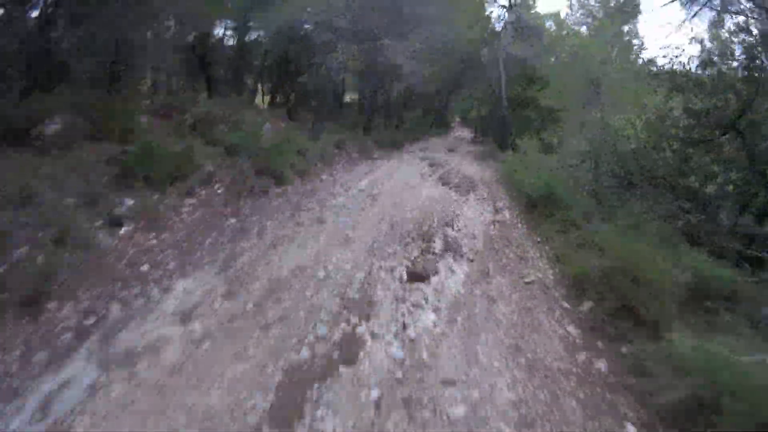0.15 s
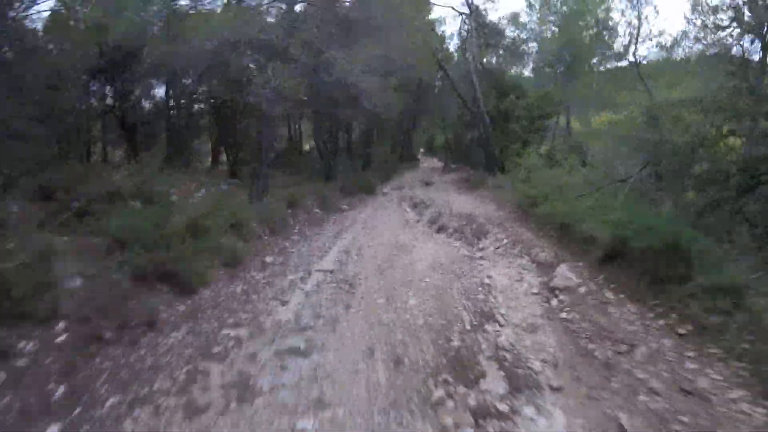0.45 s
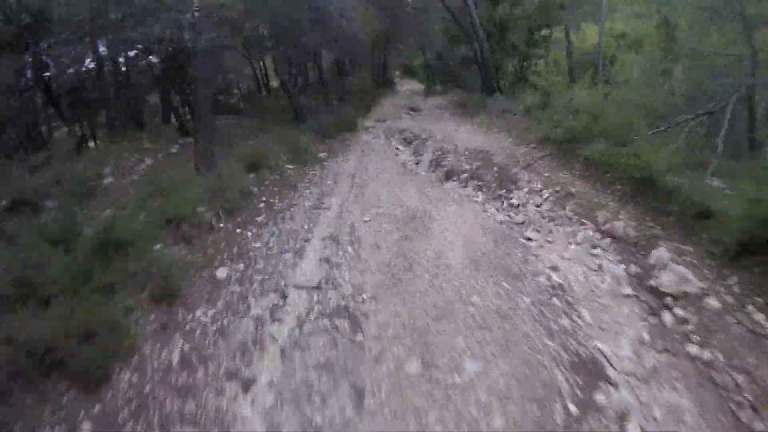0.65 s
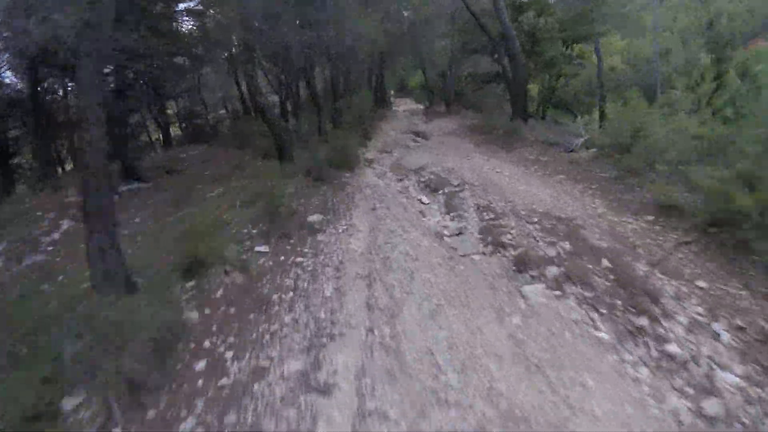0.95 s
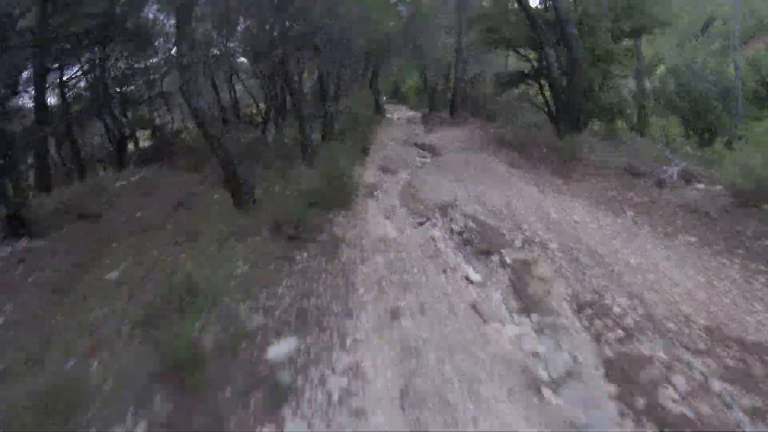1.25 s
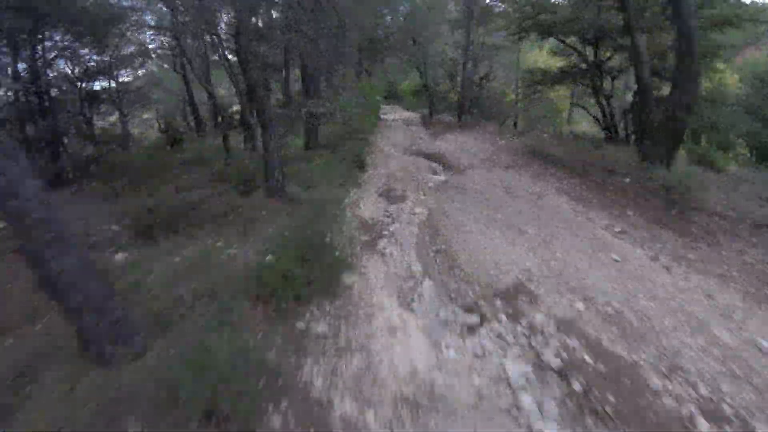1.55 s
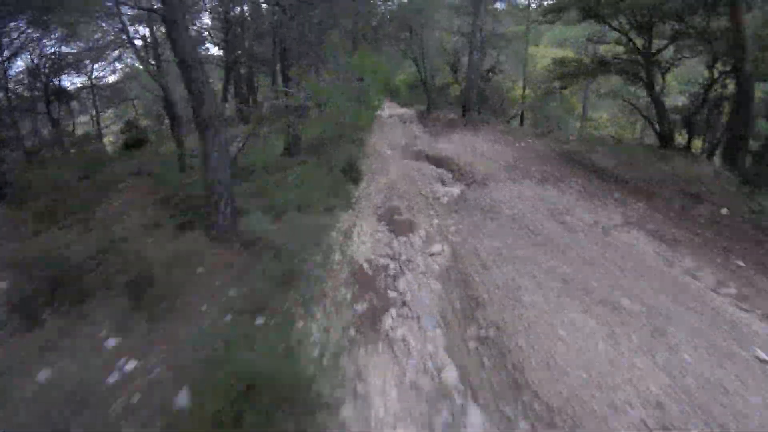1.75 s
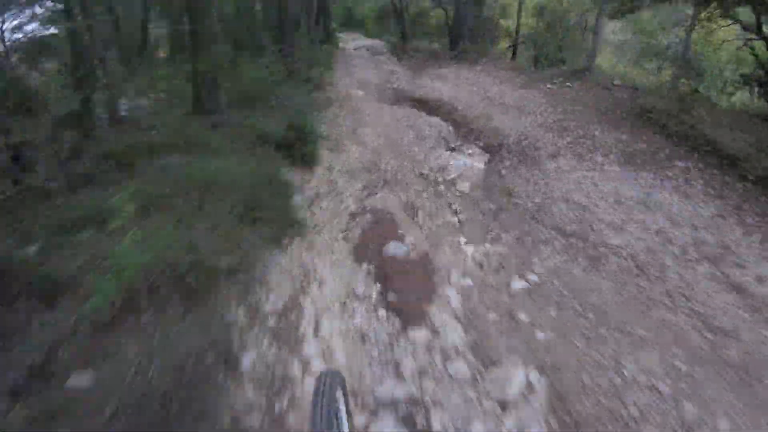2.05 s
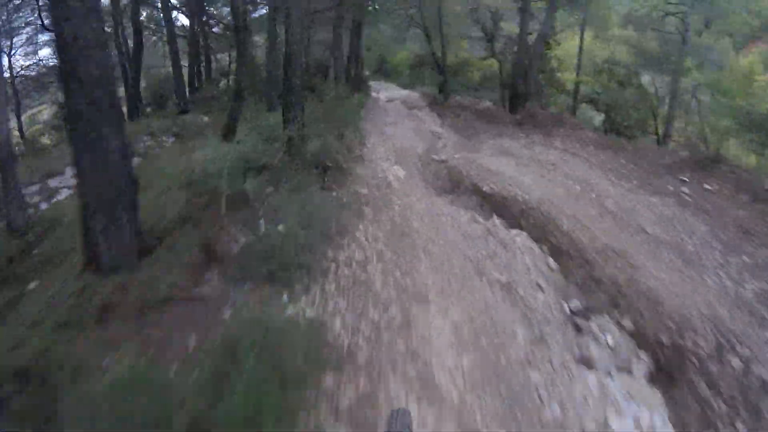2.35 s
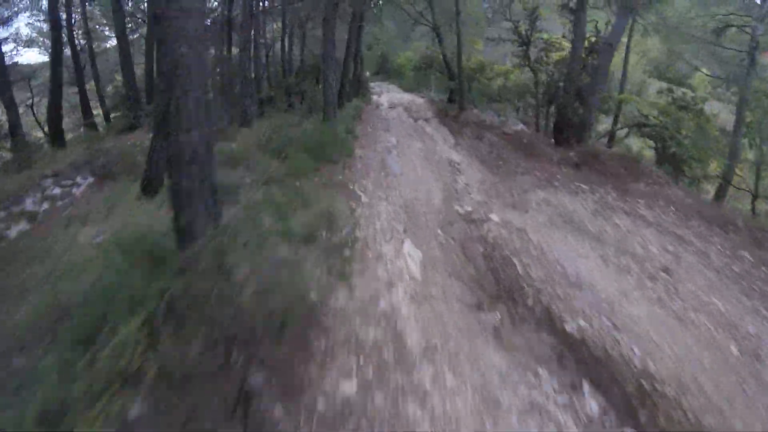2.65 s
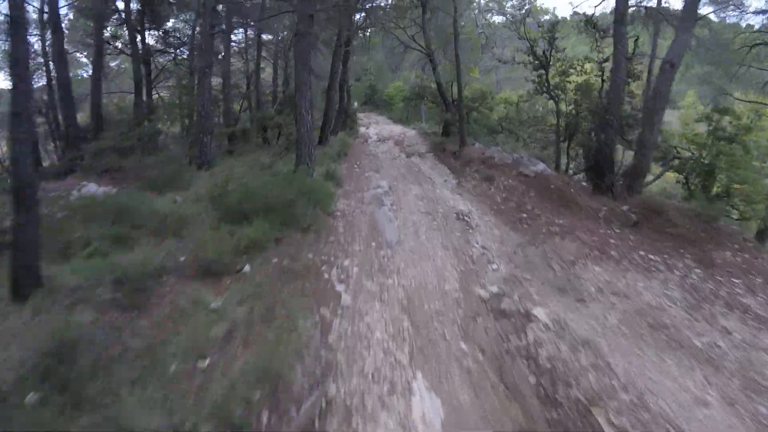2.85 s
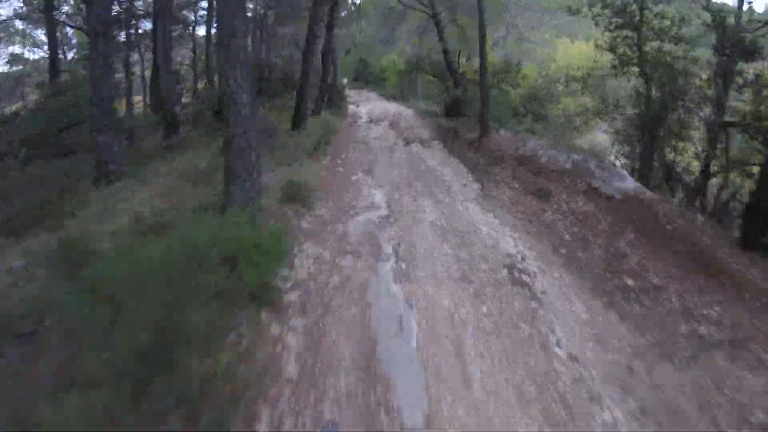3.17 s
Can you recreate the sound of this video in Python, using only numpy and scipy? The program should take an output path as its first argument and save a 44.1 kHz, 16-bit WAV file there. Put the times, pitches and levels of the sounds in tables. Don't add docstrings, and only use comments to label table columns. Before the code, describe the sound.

Bike tyres drum on loose stones, roughest near the start, with muffled wind thumping the enclosed onboard microphone; later a loud double clack, a brief hush, and the rumble gradually swelling back, outdoors without echo.

```python
import sys
import numpy as np
from scipy import signal
from scipy.fft import rfft, irfft
from scipy.io import wavfile
from scipy.ndimage import uniform_filter1d

SR = 44100
rng = np.random.default_rng(int(sys.argv[2]) if len(sys.argv) > 2 else 0)


def how_loud(loudness_db):
    steps = np.asarray(loudness_db, float) / 20
    return 10 ** steps


def wav_out(sig):
    wavfile.write(sys.argv[1], SR, np.round(np.clip(np.atleast_2d(sig).T, -1, 1) * 32767).astype(np.int16))


N = 145971


def evened(x):
    return x / np.sqrt(np.mean(x ** 2) + 1e-20)


def add(mix, start_s, sound):
    part = mix[round(start_s * SR):][:len(sound)]
    part += sound[:len(part)]


def wander(per_s):
    hz = np.fft.rfftfreq(N, 1 / SR)
    spectrum = rfft(rng.standard_normal(N)) / (1 + (hz / per_s) ** 2)
    return evened(irfft(spectrum, N))


def shell(x, modes, tilt_db=0):
    out = np.zeros(len(x))
    for k, (hz, width_hz, db) in enumerate(modes):
        b, a = signal.iirpeak(hz, hz / max(width_hz, 20), fs=SR)
        gain = how_loud(db + tilt_db * np.log2(hz / 4000))
        ring = signal.lfilter(b, a, signal.lfilter(b, a, x))
        sign = (-1) ** k
        out += sign * gain * ring / np.sqrt(width_hz)
    return out


# time in seconds, buffeting level in dB, ground roughness in dB.
RIDE_COURSE = [(0.0, -21.5, -50), (.2, -19, -45.5), (.4, -18.5, -43.5), (.51, -16, -42),
               (.65, -21.5, -43.5), (.7, -17, -46.5), (.78, -17, -52), (1.08, -17, -53), (1.21, -17, -48.5),
               (1.35, -18, -47.5), (1.45, -17, -48.5), (2.05, -18, -47.5), (2.16, -29.5, -58.5),
               (2.3, -25.5, -51.5), (2.65, -25, -55.5), (2.82, -21.5, -52), (3.17, -18, -47.5),
               (3.31, -17.5, -47)]


def ride_level(column):
    rows = np.array(RIDE_COURSE)
    return np.interp(np.arange(N) / SR, rows[:, 0], rows[:, column])


# frequency in Hz, level in dB per Hz.
BUFFET_SPECTRUM = [(8.8, -25), (15, -2), (70, -1), (292, -17), (572, -30), (945, -26.5), (1500, -42.5),
                   (1950, -54.5), (3300, -120)]


def buffet():
    trim_db, gust_db, gusts_per_s, even_s = 0.56, 0.88, 7.5, 0.057
    hz = np.fft.rfftfreq(N, 1 / SR)
    f, db = np.transpose(BUFFET_SPECTRUM)
    colour = how_loud(np.interp(np.log(hz + 1), np.log(f), db, right=-90))
    colour *= np.minimum(hz / f[0], 1) ** 2
    noise = evened(irfft(rfft(rng.standard_normal(N)) * colour, N))
    window = round(even_s * SR)
    power = uniform_filter1d(uniform_filter1d(noise ** 2, window), window)
    noise = evened(noise / np.sqrt(abs(power)))
    return noise * how_loud(ride_level(1) + trim_db + gust_db * wander(gusts_per_s))


def grit():
    per_s, spread_db, decay_s = 200, 2, 0.0015
    size = how_loud(spread_db * np.minimum(rng.exponential(1, N), 4))
    size = size * (rng.random(N) < per_s / SR)
    decay = np.exp(-np.arange(1500) / SR / decay_s)
    return evened(signal.oaconvolve(size, decay)[:N] * rng.standard_normal(N))


# frequency in Hz, width in Hz, level in dB.
LOW_SHELL_MODES = [(648, 415, 7), (931, 198, 6.5), (1180, 454, 4.5), (1528, 1400, -12.5)]
HIGH_SHELL_MODES = [(2572, 735, 5.5), (3648, 650, 1), (5000, 1100, -7), (5730, 1450, -7), (6650, 1170, -3),
                    (8800, 2600, -17), (11780, 3300, -13), (14500, 2500, -24)]


def tyres():
    buzz_db, flutter_db, grit_db = -2, 4, -8
    high_trim_db, low_trim_db = -1.5, 14
    rough_db, shared_grit, shared_flutter = ride_level(2), grit(), wander(36)
    drives = []
    for _ in range(3):
        flutter = 0.56 * shared_flutter + 0.58 * wander(47)
        buzz = how_loud(buzz_db + flutter_db * flutter) * rng.standard_normal(N)
        drives.append(buzz + how_loud(grit_db) * (0.37 * shared_grit + 1.2 * grit()))
    high = shell(drives[0], HIGH_SHELL_MODES[:2]) + shell(drives[1], HIGH_SHELL_MODES[2:-1])
    low = shell(drives[2], LOW_SHELL_MODES)
    return evened(high) * how_loud(rough_db + high_trim_db) + evened(low) * how_loud(rough_db + low_trim_db)


def hit(peak_db, knock_db, bright_db, decay_s, low_modes):
    t, rise_s = np.arange(3000) / SR, 0.0014
    shape = np.minimum(t / rise_s, 1) * np.exp(-t / max(decay_s, .0005))
    tick = shell(shape * rng.standard_normal(3000), HIGH_SHELL_MODES, bright_db)
    push = 0.76 * (t < .0003)
    knock = shell(shape * rng.standard_normal(3000) + push, low_modes)
    return how_loud(peak_db) * tick / abs(tick).max() + how_loud(knock_db) * knock / abs(knock).max()


# start in seconds, peak in dB, knock in dB,
# brightness in dB per octave, decay in seconds.
CLATTER_HITS = [(2.0837, -10.5, -4, -2, 0.0038), (2.092, -20, -9, 3, 0.0064),
                (2.1073, -22.5, -22, 15, 0.0011), (2.1135, -19, -32, 1, 0.0046),
                (2.125, -21, -31, 3, 0.0033), (2.132, -9, -6.5, 3, 0.0029), (2.1366, -8.5, -6, 3, 0.0011),
                (2.147, -23, -19.5, 0, 0.008), (2.159, -42, -19, 1, 0.011), (2.189, -29.5, -27, 1, 0.0044),
                (2.196, -37, -23.5, 12, 0.0037)]
# frequency in Hz, width in Hz, level in dB.
EARLY_PART_MODES = [(687, 230, -10), (888, 140, -0.5), (1170, 390, -10), (1930, 900, -10.5),
                    (2820, 270, -13), (3620, 630, -13), (4480, 440, -15)]
LATE_PART_MODES = [(790, 250, -7), (1130, 210, 2.5), (2050, 670, -8), (2940, 400, -13), (3960, 400, -6),
                   (7300, 700, -19)]


def clatter():
    out, shift_s = np.zeros(N), 2.12
    for start_s, *blow in CLATTER_HITS:
        modes = LATE_PART_MODES if start_s > shift_s else EARLY_PART_MODES
        add(out, start_s, hit(*blow, modes))
    return out


# start in seconds, length in seconds.
SCRAPE_TIMES = [
    (2.085, .14),
    (2.88, .078),
    (.5, .1),
    (.668, .035),
    (2.02, .05),
]
# level in dB, brightness in dB per octave.
SCRAPE_LEVELS = [(-40, 4.5), (-43, 5.5), (-38.5, -0.5), (-48, 7), (-43.5, 3.5)]


def scrapes():
    out = np.zeros(N)
    for (start_s, length_s), (db, bright_db) in zip(SCRAPE_TIMES, SCRAPE_LEVELS):
        noise = rng.standard_normal((9000, 2))[:round(length_s * SR)]
        lumps = how_loud(3.2 * evened(uniform_filter1d(noise[:, 1], 150)))
        sound = shell(noise[:, 0] * lumps, HIGH_SHELL_MODES, bright_db)
        swell = np.sin(np.pi * np.linspace(0, 1, len(sound)) ** 0.99)
        add(out, start_s, how_loud(db) * evened(sound) * swell)
    return out


# time in seconds, then peak in dB in the upper, lower and top regions of the
TICKS = [(0.1055, -47, -44, -64), (0.1364, -45, -43, -59), (0.1525, -43, -48, -56),
         (0.1689, -44, -47, -52), (0.189, -39, -47, -49), (0.2094, -38, -43, -57),
         (0.2453, -36, -44, -58), (0.2967, -37, -37.5, -60), (0.3282, -39, -33.5, -60),
         (0.3779, -34, -35, -52), (0.4004, -42, -42, -62), (0.4436, -18.5, -28.5, -50),
         (0.4734, -37, -34, -63), (0.4834, -35, -30, -57), (0.4965, -30, -48, -57),
         (0.5147, -36, -35, -58), (0.5312, -27, -35, -61), (0.5384, -30, -35, -56),
         (0.5482, -24, -37, -54), (0.5596, -27, -37, -58), (0.5744, -28, -40, -58),
         (0.5934, -35, -36, -60), (0.6104, -38, -40, -63), (0.628, -30.5, -42, -64),
         (0.6574, -40, -38, -59), (0.675, -35, -41, -48), (0.6894, -37, -39, -55),
         (0.7247, -39, -41, -66), (0.9093, -50, -45, -74), (0.9587, -37, -48, -57),
         (0.989, -32.5, -41.5, -47), (1.0339, -44, -53, -70), (1.0519, -39, -39, -54),
         (1.061, -42, -47, -51), (1.0814, -42, -47, -67), (1.1037, -48, -40, -62),
         (1.1267, -30, -37.5, -57), (1.172, -40, -39.5, -54),
         (1.2709, -43, -40, -64), (1.289, -40, -47, -67), (1.362, -42, -42, -63),
              (1.3902, -43, -43, -58), (1.4292, -39, -38, -60), (1.448, -35.5, -40, -52),
              (1.509, -40, -45, -69), (1.5616, -27, -39, -67), (1.6267, -30.5, -51, -61),
              (1.702, -42, -48, -64), (1.8312, -41, -42, -62), (1.944, -41, -51, -62),
              (2.0163, -40, -41, -51), (2.0328, -35, -35, -54), (2.2414, -36.5, -44, -64),
              (2.2992, -38, -44, -66), (2.3261, -47, -57, -72), (2.3469, -46, -44, -72),
              (2.4004, -40.5, -42.5, -65), (2.4788, -43.5, -53, -59), (2.5247, -44, -41.5, -61),
              (2.698, -50, -45, -69), (2.7531, -47, -44.5, -59), (2.8554, -47, -42, -60),
              (2.8853, -42, -42, -57), (2.9053, -39, -49, -49), (2.919, -30, -37, -47),
              (2.9552, -41, -49, -65), (3.0061, -46, -45, -68), (3.0203, -39, -51, -68),
              (3.0515, -43, -43, -65), (3.0734, -42, -42, -64), (3.0954, -38, -44, -62),
              (3.1144, -46, -42, -62), (3.176, -49, -39.5, -61), (3.255, -34, -36.5, -57)]


def rattles():
    decay_s, rise_s = 0.0021, 0.0018
    out, t = np.zeros(N), np.arange(1500) / SR
    shape = np.minimum(t / rise_s, 1) * np.exp(-t / decay_s)
    regions = HIGH_SHELL_MODES[2:5], HIGH_SHELL_MODES[:2], HIGH_SHELL_MODES[5:7]
    trims_db = -0.5, 6.5, 7
    for time_s, *peaks_db in TICKS:
        noise = shape * rng.standard_normal(1500)
        for modes, db, trim_db in zip(regions, peaks_db, trims_db):
            tick = shell(noise, modes)
            add(out, time_s - rise_s / 2, how_loud(db + trim_db) * tick / abs(tick).max())
    return out


# time in seconds, peak in dB, ring frequency in Hz.
HOUSING_KNOCKS = [(0.15, -23, 972), (0.218, -19, 1090), (0.249, -17, 781), (0.341, -15, 727),
                  (0.382, -19, 910), (0.45, -19, 958), (0.462, -18.5, 980), (0.483, -9, 856),
                  (0.515, -14, 958), (0.522, -10.5, 1086), (0.531, -13, 646), (0.538, -11, 1030),
                  (0.657, -13.5, 972), (0.696, -19, 1000), (0.758, -18, 634), (1.05, -16, 880),
                  (1.127, -15.5, 1010), (1.148, -19, 1030), (1.262, -23, 990), (1.39, -16.5, 950),
                  (1.646, -18, 622), (1.862, -13.5, 965), (1.922, -25, 860), (1.977, -17, 926),
                  (2.004, -24, 888), (2.4, -20.5, 996), (2.527, -27, 960), (2.887, -22, 910),
                  (2.99, -17, 883)]


def knocks():
    decay_s, rise_s, trim_db = 0.0023, 0.001204, -3.5
    out, t = np.zeros(N), np.arange(1500) / SR
    shape = (1 - np.exp(-t / rise_s)) * np.exp(-t / decay_s)
    for time_s, db, hz in HOUSING_KNOCKS:
        ring = np.sin(2 * np.pi * (hz * t + rng.random()))
        ring += 0.27 * np.sin(2 * np.pi * (1.6 * hz * t + rng.random()))
        add(out, time_s - rise_s, how_loud(db + trim_db) * ring * shape / shape.max())
    return out


# start in seconds, frequency in Hz, peak in dB, length in seconds.
BUMP_SWELLS = [(0.1406, 64.5, -14, 0.11), (.26, 44.4, -10.5, 0.1), (.45, 31.8, -11, 0.12),
               (0.62, 133.5, -15.5, 0.047), (1.22, 40.3, -11.5, 0.11), (1.43, 160, -17.5, 0.066),
               (3.22, 43.3, -13.5, 0.13), (3.24, 108, -12.5, 0.059), (2.150, 1140, -19, 0.013),
               (2.161, 1130, -22.5, .016), (2.152, 942, -24, 0.022), (0.72, 700, -27, 0.033),
               (.85, 900, -26, 0.033), (2.62, 190, -20.5, 0.046), (1.15, 260, -21, .05),
               (2.192, 990, -33, 0.011), (2.0, 149, -17, .07), (2.132, 740, -15.5, 0.0054)]


def swells():
    out = np.zeros(N)
    for start_s, hz, db, length_s in BUMP_SWELLS:
        u = np.linspace(0, 1, round(length_s * SR))
        swing = np.sin(2 * np.pi * (hz * length_s * u + rng.random()))
        add(out, start_s, how_loud(db) * np.sin(np.pi * u ** 1.07) * swing)
    return out


# time in seconds, level in dB.
RUMBLE_LEVEL = [(0.0, -31.5), (0.31, -32.5), (0.47, -23), (0.59, -27), (0.76, -23), (1.41, -29.5),
                (1.5, -20.5), (1.52, -26), (2.01, -27.5), (2.04, -20), (2.17, -53), (2.22, -29),
                (2.58, -39.5), (2.65, -26.5), (2.66, -37.5), (2.92, -32), (2.94, -35.5), (3.31, -25)]
# frequency in Hz, width in Hz, level in dB.
CARCASS_MODES = [(249, 210, 1), (477, 410, -6.5), (790, 450, -9.5)]


def rumble():
    trim_db, lumps_db = -3, 2
    times_s, db = np.transpose(RUMBLE_LEVEL)
    level_db = np.interp(np.arange(N) / SR, times_s, db) + trim_db + lumps_db * wander(18.5)
    return how_loud(level_db) * evened(shell(rng.standard_normal(N), CARCASS_MODES))


def scene():
    muffle = signal.butter(14, 12500, fs=SR, output="sos")
    buzz = signal.sosfilt(muffle, tyres())
    impacts = clatter() + scrapes() + rattles() + knocks()
    return (buffet() + buzz + impacts + swells() + rumble())[None]


def roll_off(x):
    return signal.sosfilt(signal.butter(12, 15680, fs=SR, output="sos"), x)


def record(dry):
    limit = .9
    mix = limit * np.tanh(dry / limit)
    return roll_off(mix)


dry = scene()
out = record(dry)
wav_out(out)
```